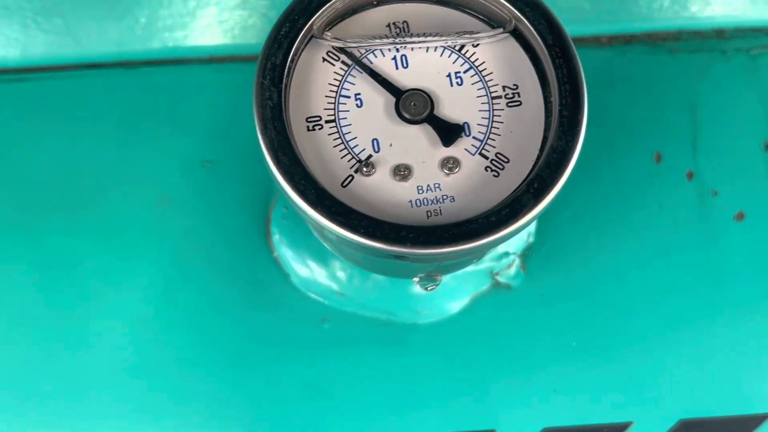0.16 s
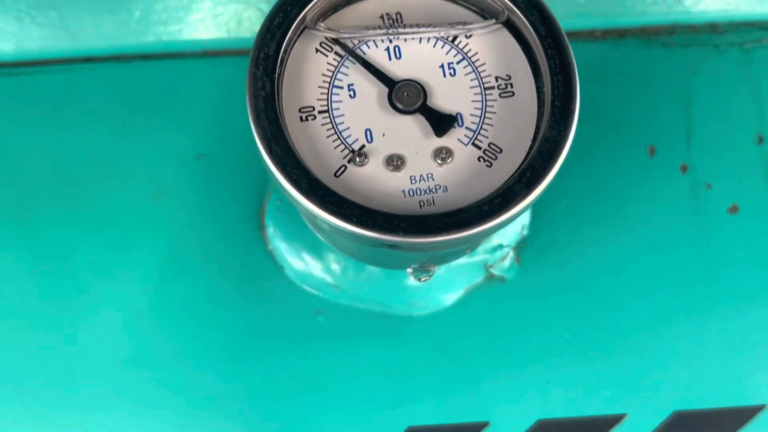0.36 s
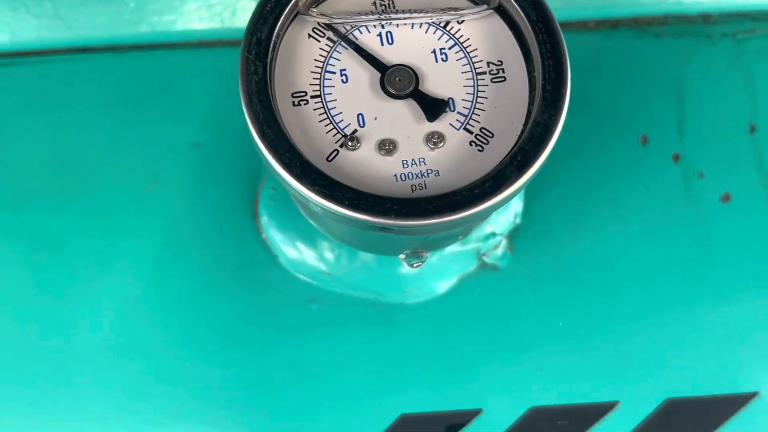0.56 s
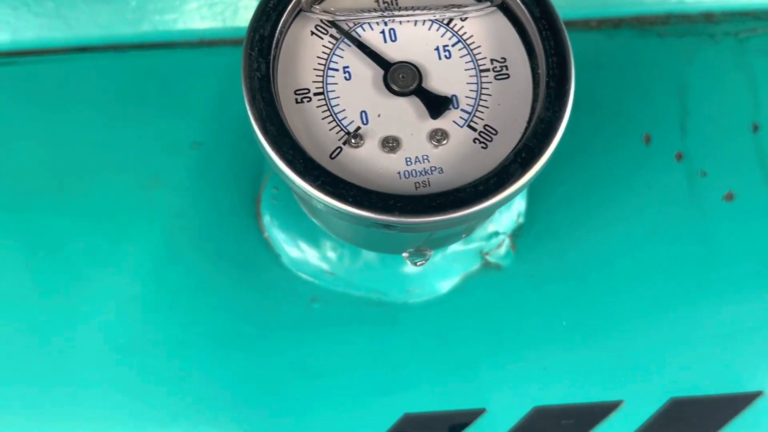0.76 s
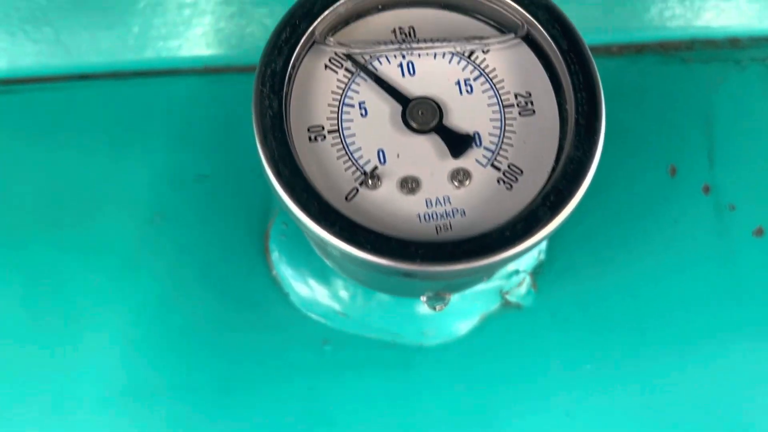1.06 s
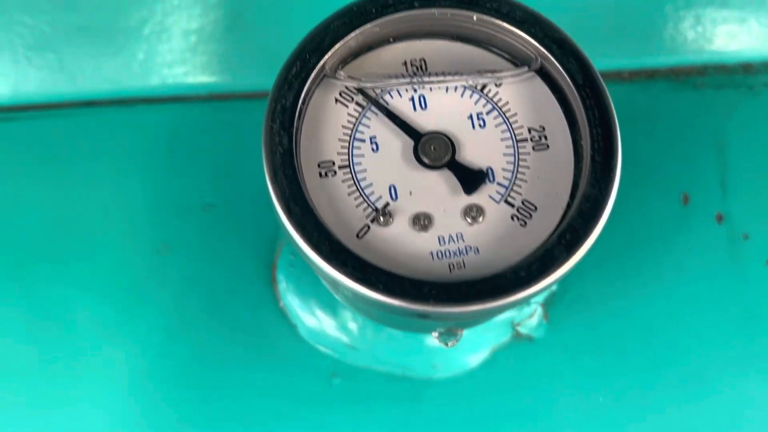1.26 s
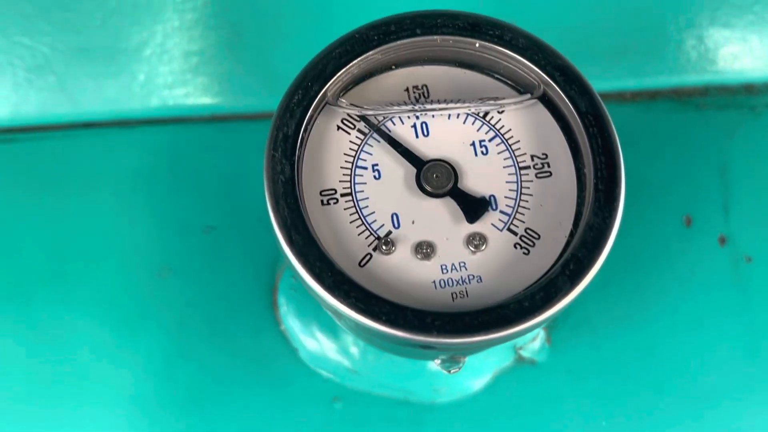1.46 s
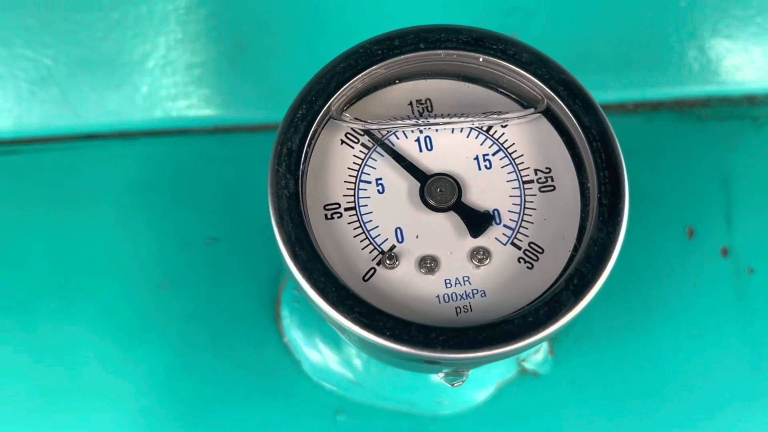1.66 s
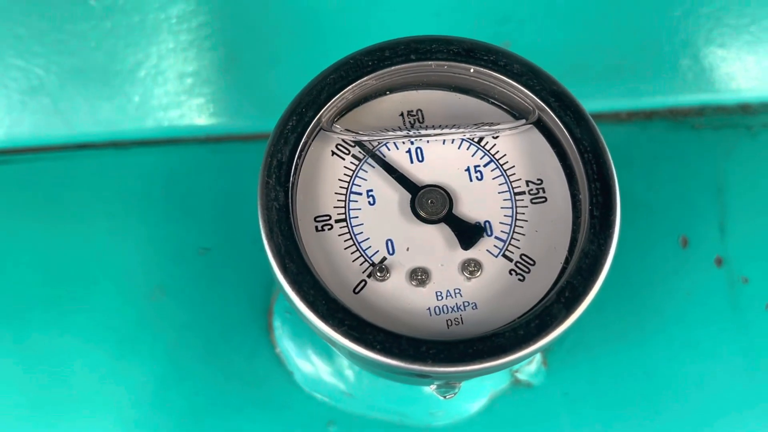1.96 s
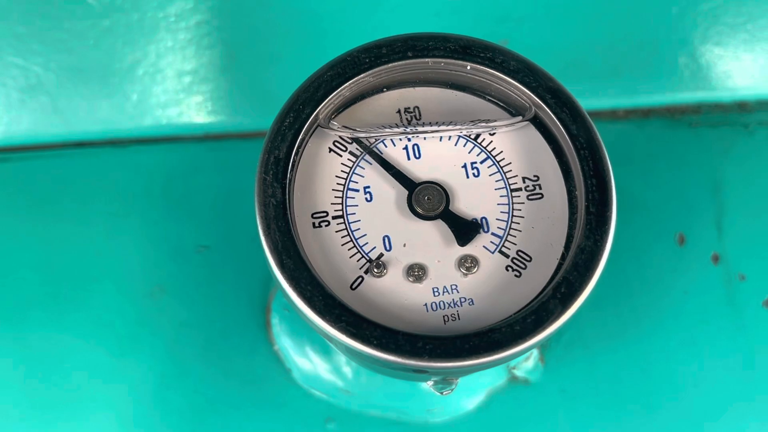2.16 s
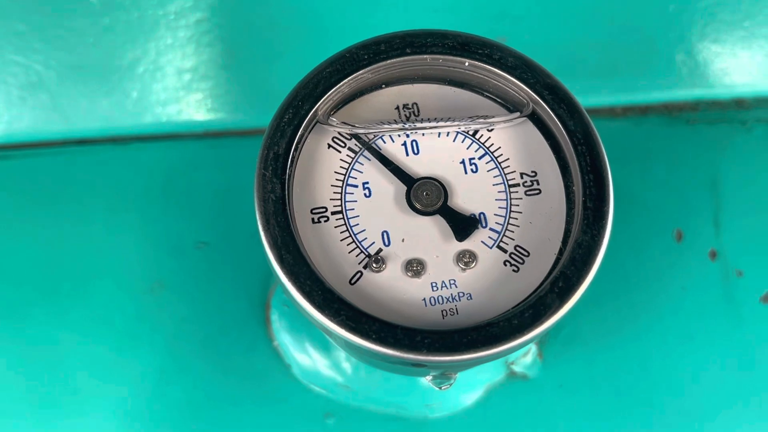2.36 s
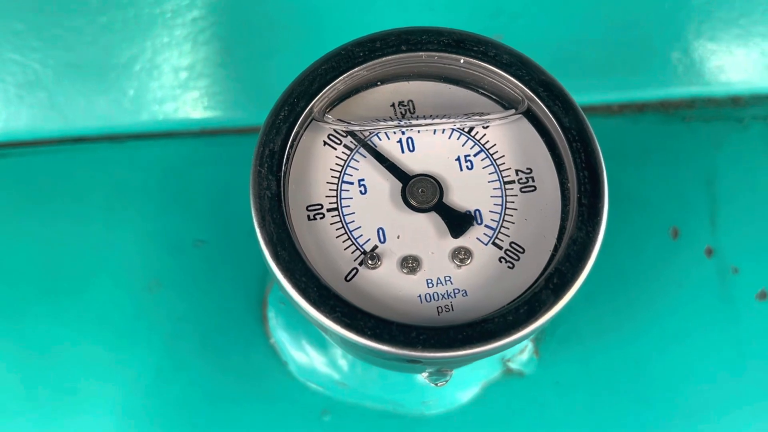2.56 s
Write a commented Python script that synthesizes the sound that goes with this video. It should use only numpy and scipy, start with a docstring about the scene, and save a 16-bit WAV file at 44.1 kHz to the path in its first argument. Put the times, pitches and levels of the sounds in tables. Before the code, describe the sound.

Steady humming drone of a screw compressor with gear whine, rushing air and soft microphone bumps

```python
"""Just above the pressure gauge on the tank of a rotary screw compressor, which runs steadily.
The rotor lobes puff out a drone, the gears whine and the motor and fan hum, all as sines tied to one rotor speed.
Cooling air rushes and whistles as coloured noise, and gusts rumble on the microphone; a few soft bumps are heard.
Near the end the microphone is moved, with a brief scuff, to a spot where the drone is much louder."""
import sys
import numpy as np
from scipy import signal
from scipy.fft import rfft, irfft
from scipy.io import wavfile

SR = 44100
rng = np.random.default_rng(int(sys.argv[2]) if len(sys.argv) > 2 else 0)


def generate_wav(signal):
    """Clip the signal to [-1, 1] and save it as 16-bit WAV at the path in sys.argv[1]."""
    frames = np.transpose(np.atleast_2d(signal))
    scaled = np.clip(frames, -1, 1) * 32767
    pcm = np.round(scaled).astype(np.int16)
    wavfile.write(sys.argv[1], SR, pcm)


N = 119511
TIME = np.arange(N) / SR  # s
OPPOSITE = np.array([[1], [-1]])  # opposite sign in the left and right ear

# Rotor speed as heard, bending while the microphone moves. Each row: time in seconds, speed in turns per s.
ROTOR_SPEED = [(0, 44.26), (2.1, 44.26), (2.18, 44.0), (2.27, 44.15), (2.37, 44.55), (2.64, 44.58),
               (2.71, 44.35)]


def from_db(db):
    """Decibels to gain."""
    return 10 ** (np.asarray(db) / 20)


def in_time(rows):
    """Each column of a curve, sample by sample; the first column is time in seconds."""
    seconds, *columns = np.transpose(rows)
    return [np.interp(TIME, seconds, column) for column in columns]


def at_hz(points, hz):
    """A spectrum of (Hz, dB) points read on a log-frequency axis."""
    point_hz, db = np.transpose(points)
    return np.interp(np.log(np.maximum(hz, 1)), np.log(point_hz), db)


def colour(sound, spectrum):
    """Filter by a table of (Hz, dB)."""
    bin_hz = np.arange(N // 2 + 1) * SR / N
    return irfft(rfft(sound) * from_db(at_hz(spectrum, bin_hz)), N)


def noise(spectrum):
    """Noise with the given dB per Hz."""
    white = rng.standard_normal(N) * np.sqrt(SR / 2)  # 0 dB per Hz
    return colour(white, spectrum)


def drift(per_s):
    """Slow chance with spread 1: noise through a double low-pass, one value every 200 samples."""
    step = 200
    pole = np.exp(-2 * np.pi * per_s * step / SR)
    steps = rng.standard_normal(N // step + 502)
    slow = signal.lfilter([1], [1, -2 * pole, pole * pole], steps)[500:]  # settled part
    return np.interp(np.arange(N) / step, np.arange(len(slow)), slow / slow.std())


def tone(cycles, db, waver, pan_db=0, lead=0):
    """A sine wavering in level and phase, at an rms level, with a left-right dB and a left lead in rad."""
    waver_per_s = 2.5
    angle = 2 * np.pi * (cycles + rng.random())
    wobble = 1 + waver * (drift(waver_per_s) + 1j * drift(waver_per_s))
    wobble = wobble / np.sqrt(1 + 2 * waver ** 2)  # keeps the rms level
    wave = from_db(db) * np.sqrt(2) * np.exp(1j * angle) * wobble
    place = from_db(pan_db / 2) * np.exp(.5j * lead)
    return np.array([(wave * place).real, (wave / place).real])


def reflection(cycles, db):
    """The part of a tone that arrives from the sides, opposite in the two ears."""
    return tone(cycles, db, waver=.15) * OPPOSITE


def air(moved):
    """Cooling air rushes and faintly whistles through the housing, louder at the second spot."""
    # Rush common to both ears. Each row: frequency in Hz, level in dB per Hz.
    rush_spectrum = [(15, -95), (30, -66), (53, -48.5), (110, -50), (170, -55), (250, -51), (320, -57.5),
                     (420, -59), (490, -66.5), (565, -57.5), (640, -65), (780, -64), (840, -71.5),
                     (900, -63.5), (1000, -66), (1120, -69), (1260, -64.5), (1430, -68), (1540, -78),
                     (1750, -77.5), (2300, -70.5), (2700, -71.5), (3100, -79), (3600, -84), (5800, -84),
                     (7500, -82), (8800, -81), (9700, -86.5), (10250, -97), (11000, -85.5), (12400, -96)]
    # Rush opposite in the ears. Each row: frequency in Hz, level in dB per Hz.
    side_spectrum = [(30, -81), (80, -60.5), (160, -73), (260, -64), (450, -64), (650, -72), (900, -69.5),
                     (1400, -76), (1700, -73.5), (2600, -84), (3300, -93), (4500, -108), (8700, -108),
                     (9300, -83), (10200, -77), (11000, -84), (12000, -108)]
    # How much louder the air is at the second spot. Each row: frequency in Hz, gain in dB.
    second_spot_gain = [(100, 1), (250, 5), (450, 9), (600, 7.5), (1000, 4.5), (1800, 3), (2600, 4),
                        (4500, 5.5), (10000, 2)]
    # Thin whistles in the airflow. Each row: frequency in Hz, width in Hz, peak level in dB per Hz.
    whistles = [(5350, 70, -82), (6310, 77, -82), (6880, 90, -83), (7560, 77, -77)]
    rush = noise(rush_spectrum) + noise(side_spectrum) * OPPOSITE
    for hz, width_hz, db in whistles:
        b, a = signal.iirpeak(hz, hz / width_hz, fs=SR)
        rush = rush + signal.lfilter(b, a, noise([(hz, db)]))
    return rush * (1 - moved) + colour(rush, second_spot_gain) * moved


def draught():
    """Gusts rumble on the microphone: low noise that rises and falls, partly opposite in the ears."""
    # Rumble before the gust level is added. Each row: frequency in Hz, level in dB per Hz.
    rumble_spectrum = [(15, -90), (28, -70), (38, -56), (55, -41), (90, -46), (130, -45.5), (200, -53),
                       (280, -57.5), (450, -65.5), (1500, -110), (5000, -150)]
    # Strength of the gusts. Each row: time in seconds, gain in dB.
    gust_level = [(0, -13), (.3, -8), (.4, 0.5), (.55, -5.5), (1.1, -3), (1.26, -1), (1.6, -6.5), (1.86, 1),
                  (1.93, 6), (2.06, -1), (2.13, -1.5), (2.18, 6), (2.29, 1), (2.35, 8), (2.42, 9),
                  (2.47, -4), (2.71, -0.5)]
    side_db = -15.5  # relative to the common part
    gust_db, = in_time(gust_level)
    common = noise(rumble_spectrum)
    side = from_db(side_db) * noise(rumble_spectrum) * OPPOSITE
    return from_db(gust_db) * (common + side)


def handling():
    """Dull, quickly damped sine bumps and one short scuff of noise just before the heaviest bump."""
    # Soft bumps of handling. Each row: start in seconds, level in dB before damping and filter, pitch in Hz.
    bump_list = [(1.255, -11, 75), (1.991, -8, 70), (2.16, -6, 60), (2.238, -8, 71), (2.41, -12, 75)]
    # Hiss of the scuff. Each row: frequency in Hz, level in dB per Hz at its peak.
    hiss_spectrum = [(60, -93), (300, -68), (1400, -70), (3000, -75), (4300, -72), (5400, -65.5),
                     (6400, -78), (7600, -66), (9500, -85), (12000, -96)]
    # Lingering body of the scuff. Each row: frequency in Hz, level in dB per Hz at its peak.
    body_spectrum = [(200, -75), (700, -66), (1400, -60.5), (2000, -70), (2800, -63), (4000, -85),
                     (9000, -110)]
    bump_t60_s, bump_band_hz = 0.073, [41, 250]
    scuff_s, rise_s, hiss_fall_s, body_fall_s = 2.146, 0.011, 0.014, 0.056
    bumps = 0
    for start_s, db, hz in bump_list:
        age = np.maximum(TIME - start_s, 0)
        bumps = bumps + from_db(db - 60 * age / bump_t60_s) * np.sin(2 * np.pi * hz * age)
    soften = signal.butter(1, bump_band_hz, "band", fs=SR, output="sos")
    scuff = 0
    for spectrum, fall_s in ((hiss_spectrum, hiss_fall_s), (body_spectrum, body_fall_s)):
        distance = np.maximum((scuff_s - TIME) / rise_s, (TIME - scuff_s) / fall_s)
        scuff = scuff + np.exp(-distance) * noise(spectrum)
    return signal.sosfilt(soften, bumps) + scuff


def motor_and_fan(turns):
    """Hum lines beside the drone, and the faint comb of the slower motor shaft."""
    # Motor and fan tones. Each row: frequency in Hz at the starting rotor speed, level in dB.
    hum_lines = [(206.6, -36.5), (236.1, -33), (268.3, -31.5), (324.6, -41.5), (331, -38.5), (383.6, -44.5),
                 (413.1, -48), (442.7, -50.5), (472.2, -48), (500.6, -54), (560, -47), (572, -46.5),
                 (649.2, -53.5), (969, -52.5), (1033, -53.5), (1209, -53.5), (1269, -53), (1447, -46)]
    # Comb of the motor shaft. Each row: frequency in Hz, level of each tone in dB.
    comb_spectrum = [(1700, -70.5), (2100, -68), (2550, -59), (2900, -63), (3400, -72.5)]
    gear_ratio = 1.5  # rotor turns per motor turn
    speed = ROTOR_SPEED[0][1]
    # every third motor multiple falls on a rotor multiple and is left out
    comb_hz = [k * speed / gear_ratio for k in range(60, 114) if k % 3]
    comb = [(hz, at_hz(comb_spectrum, hz)) for hz in comb_hz]
    return sum(tone(turns * hz / speed, db, waver=0.24, pan_db=1.5 * rng.normal(), lead=.3 * rng.normal())
               for hz, db in [*hum_lines, *comb])


def gears(turns, moved):
    """A dense, uneven comb on the rotor speed with some strong teeth, and its reflections."""
    # Strongest gear tones. Each row: multiple of the rotor speed, dB at the gauge, dB at the louder spot.
    strong_teeth = [(42, -53, -54), (44, -54, -54), (48, -52, -53), (50, -44, -44), (51, -43.5, -46),
                    (53, -60, -45), (54, -54, -48), (55, -55, -40), (56, -41, -49), (58, -52, -53),
                    (59, -48, -50), (60, -54, -41), (61, -49.5, -46), (62, -54, -54), (63, -52, -53),
                    (64, -53, -48), (65, -49.5, -52), (68, -56, -54), (70, -53, -56), (71, -54, -57),
                    (72, -63, -55), (75, -55, -47), (94, -64, -63), (110, -63, -62), (120, -65, -64),
                    (142, -65, -63), (164, -66, -63), (172, -64, -61)]
    # Weaker multiples at the gauge, before unevenness. Each row: frequency in Hz, level of each tone in dB.
    weak_teeth = [(800, -58), (1400, -61.5), (1650, -63), (2200, -60), (2700, -59.5), (3200, -65.5),
                  (3700, -71.5), (5000, -77.5)]
    # Side reflections at the gauge, before unevenness. Each row: frequency in Hz, level of each tone in dB.
    side_levels = [(800, -52), (1250, -61), (1700, -66), (2100, -64), (2300, -68), (2550, -53), (2800, -63),
                   (3100, -64), (3500, -78), (4500, -108), (7000, -105)]
    uneven_db, moved_db = 4, 3.5  # chance spread between teeth; gain at the louder spot
    speed = ROTOR_SPEED[0][1]
    # the strong teeth reach their new levels early in the move, by about 0.15 of the way
    shifted = np.clip(moved * 6.5, 0, 1)
    waver = .07 + .18 * shifted  # the whine wavers more once the microphone is moved

    def uneven(spectrum, k):
        return at_hz(spectrum, k * speed) + uneven_db * rng.normal() + moved_db * moved

    levels = {k: uneven(weak_teeth, k) for k in range(19, 112)}
    for k, gauge_db, second_db in strong_teeth:
        levels[k] = gauge_db + (second_db - gauge_db) * shifted
    whine = 0
    for k, db in levels.items():
        whine = whine + tone(turns * k, db, waver, pan_db=-1.5)
        whine = whine + reflection(turns * k, uneven(side_levels, k))
    return whine


def drone(turns, moved):
    """Each lobe lets out one puff per turn: a clean harmonic stack."""
    # Strongest harmonics at the microphone. Each row: time in seconds, then five levels in dB.
    harmonic_levels = [(0, -26.5, -22.5, -37, -31, -46.5), (2.13, -32, -23.5, -36.5, -31, -46),
                       (2.2, -22.5, -19, -33, -30, -36), (2.26, -21.5, -17, -35, -41, -48),
                       (2.34, -15.5, -15, -36, -34, -49), (2.41, -21.5, -15, -26, -26, -47),
                       (2.46, -19.5, -12.5, -30.5, -34, -29.5), (2.52, -25.5, -12, -27, -37, -42),
                       (2.57, -21.5, -11, -25, -31.5, -29), (2.71, -23.5, -11.5, -22, -40, -27.5)]
    # Those five in order. Each row: multiple of the puff rate, left-right in dB, left lead in rad.
    harmonic_places = [(1, 2.7, 0), (2, 3.5, .35), (3, 6, -0.34), (4, -2.4, -.15), (6, 2.5, -.3)]
    # Weaker harmonics. Each row: multiple, dB at the gauge, dB at the louder spot, dB of the reflection.
    weak_harmonics = [(5, -56, -41, -47), (7, -42, -41, -51), (8, -47, -36, -45.5)]
    puffs = turns * 4  # four lobes
    stack = 0
    for db, (k, pan_db, lead) in zip(in_time(harmonic_levels), harmonic_places):
        stack = stack + tone(puffs * round(k), db, waver=0.053, pan_db=pan_db, lead=lead)
    for k, gauge_db, second_db, side_db in weak_harmonics:
        db = gauge_db + (second_db - gauge_db) * moved
        stack = stack + tone(puffs * round(k), db, waver=0.14)
        stack = stack + reflection(puffs * round(k), side_db)
    return stack


def scene():
    """One shaft drives all the tones; air and handling lie around them."""
    # Way from the gauge to the louder spot. Each row: time in seconds, share of the way from 0 to 1.
    microphone_path = [(2.12, 0), (2.32, 0.21), (2.44, 0.96), (2.58, 0.94), (2.71, 0.96)]
    speed, = in_time(ROTOR_SPEED)
    turns = np.cumsum(speed) / SR
    moved = np.clip(in_time(microphone_path)[0], 0, 1)
    surroundings = air(moved) + draught() + handling()
    return surroundings + motor_and_fan(turns) + gears(turns, moved) + drone(turns, moved)


def record(dry):
    """The highest peaks are rounded towards full scale and the top is cut steeply."""
    peak_limit, cutoff_hz = 1, 12400
    rounded = dry / (1 + (dry / peak_limit) ** 10) ** (1 / 10)
    top_cut = signal.ellip(10, .1, 80, cutoff_hz, fs=SR, output="sos")
    return signal.sosfilt(top_cut, rounded)


dry = scene()
out = record(dry)
generate_wav(out)
```